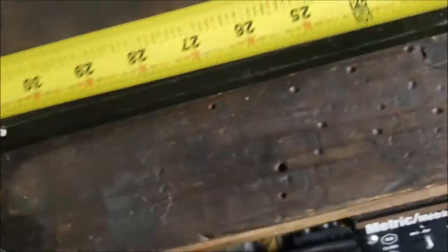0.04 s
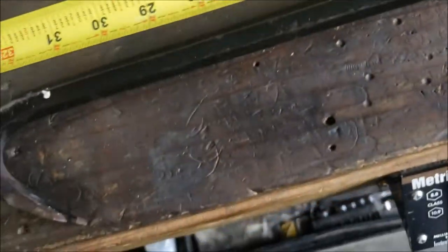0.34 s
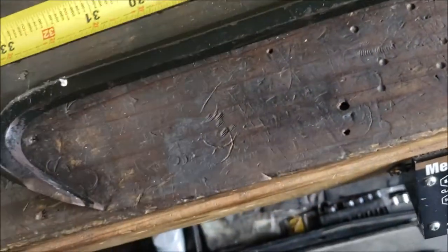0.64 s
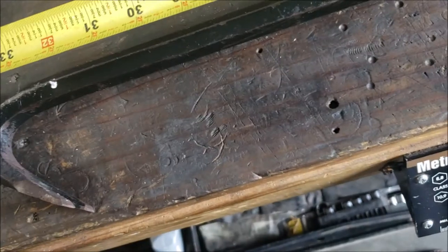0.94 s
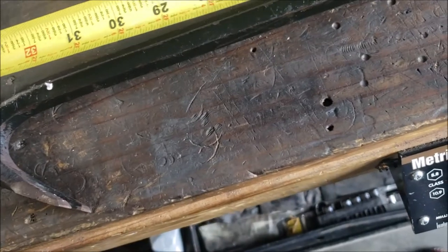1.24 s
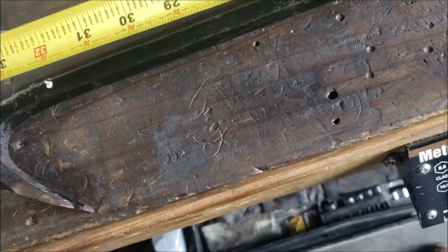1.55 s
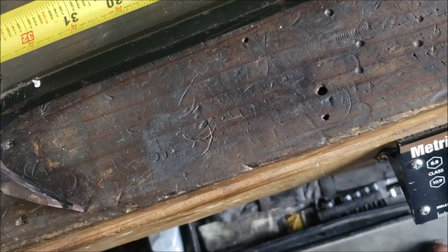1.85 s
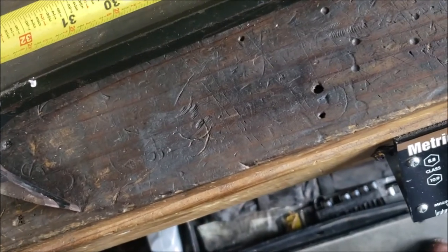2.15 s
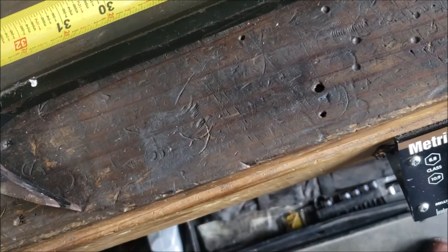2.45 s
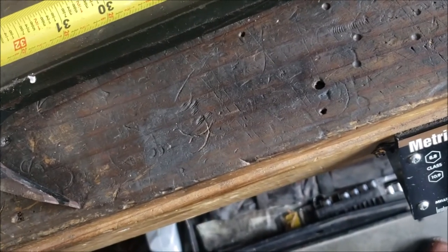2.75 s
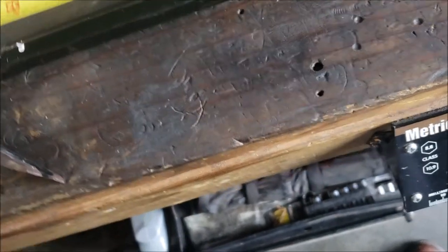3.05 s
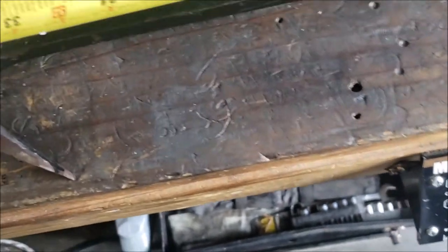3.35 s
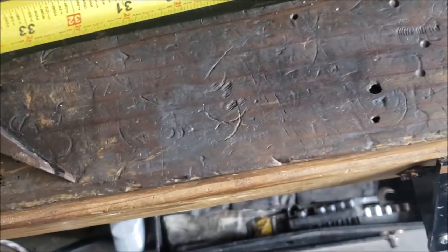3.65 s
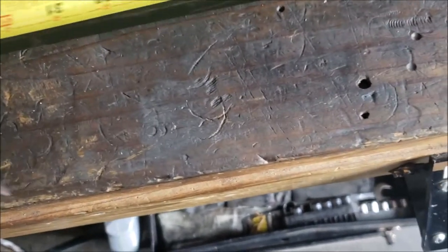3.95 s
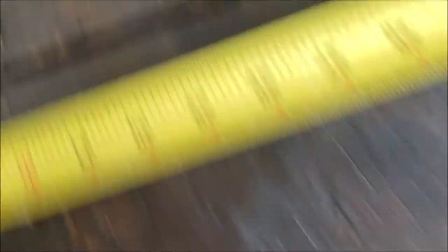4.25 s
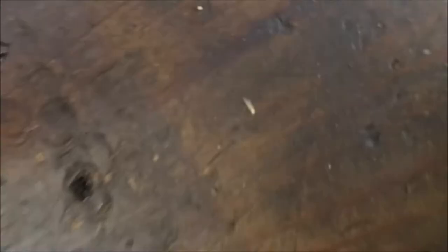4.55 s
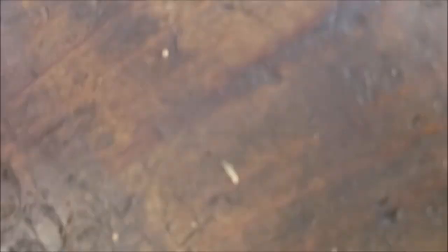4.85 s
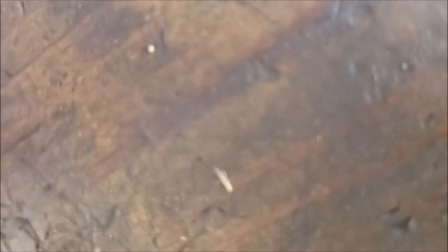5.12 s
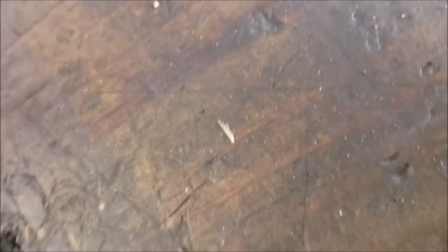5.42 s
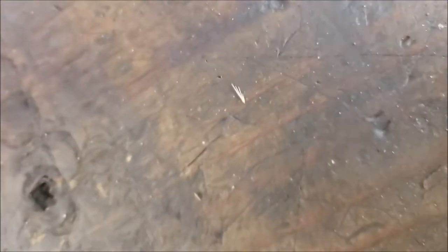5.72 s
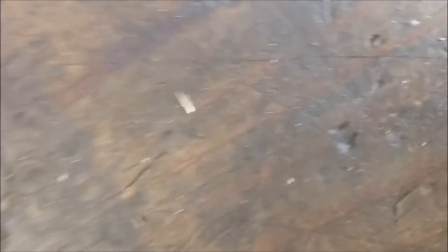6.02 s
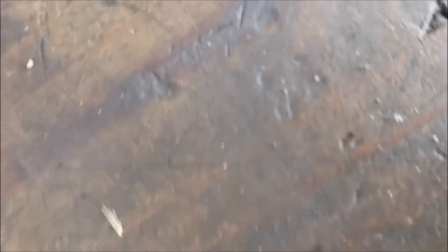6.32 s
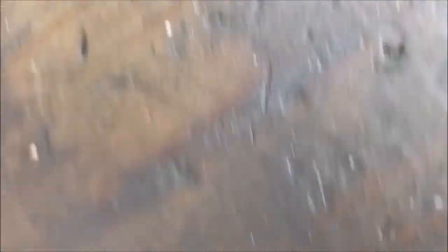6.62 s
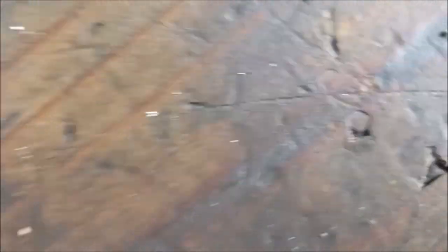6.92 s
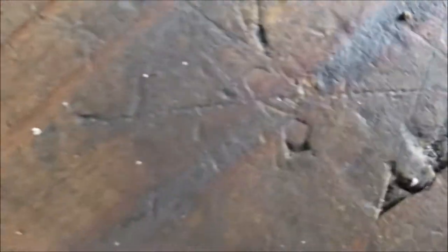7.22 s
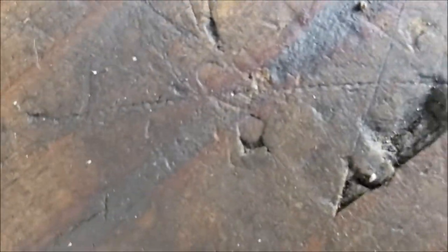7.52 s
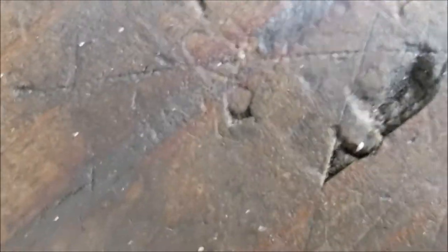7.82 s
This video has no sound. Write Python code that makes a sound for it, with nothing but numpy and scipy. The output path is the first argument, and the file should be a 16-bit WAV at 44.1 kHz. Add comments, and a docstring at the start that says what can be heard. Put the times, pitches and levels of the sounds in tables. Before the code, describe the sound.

Irregular metallic snaps, ticks and short scrapes from a tape measure blade, with one quick retraction and knocks on wood in a small workshop.

```python
"""A steel tape measure is handled on a wooden workbench in a small workshop.
Its hook ticks, and its curved blade buckles with a slap and rings in its bending modes. Friction makes
the blade scrape as it is dragged and as the spring rewinds it; the case knocks and rubs on the wood.
The bench resonates and the walls reflect. A hand on a nearby camera rumbles over the room's low drone."""
import sys
import numpy as np
from scipy import signal
from scipy.fft import rfft, irfft, next_fast_len
from scipy.io import wavfile
from scipy.ndimage import uniform_filter1d, map_coordinates

SR = 44100
rng = np.random.default_rng(int(sys.argv[2]) if len(sys.argv) > 2 else 0)


def log_audio(samples):
    """Write samples as a 16-bit WAV file to the path given in sys.argv[1]."""
    # one column per channel
    frames = np.atleast_2d(samples).T
    # limit to full scale, then quantise
    limited = np.clip(frames, -1, 1)
    pcm = np.round(limited * 32767).astype(np.int16)
    wavfile.write(sys.argv[1], SR, pcm)


N = 351477
TIME = np.arange(N) / SR
HIT = int(.3 * SR)  # samples in one blow
HIT_TIME = np.arange(HIT) / SR


def amp(db):
    """Amplitude ratio of a level in decibels."""
    return 10 ** (np.asarray(db) / 20)


def unit(x):
    """Normalisation to rms 1."""
    return x / np.sqrt(np.mean(x ** 2) + 1e-20)


def along(points, hz):
    """Interpolation on a logarithmic frequency axis."""
    freqs, values = np.transpose(points)
    return np.interp(np.log(hz + 1), np.log(freqs + 1), values)


def curves(rows):
    """Linear interpolation in time: one value per sample for each column after the first."""
    times, *columns = np.transpose(rows)
    return [np.interp(TIME, times, column) for column in columns]


def outside(start, end):
    """Seconds before start or after end, zero in between."""
    return np.maximum(start - TIME, 0) + np.maximum(TIME - end, 0)


def wobble(rate):
    """Smooth random modulation, rate knots a second."""
    return map_coordinates(rng.standard_normal(int(N * rate / SR) + 4), [TIME * rate])


def ripple(hz, width_hz):
    """Modal overlap: random peaks and notches, width_hz wide at 1 kHz and broader above."""
    position = 2 * np.sqrt(1000 * hz) / width_hz
    return map_coordinates(rng.standard_normal(1024), [position], mode="mirror")


def resonance(f, hz, width, db):
    """Frequency response of a damped oscillator."""
    return amp(db) * 1j * f * width / (hz * hz - f * f + 1j * f * width)


def filtered(x, gain):
    """Linear filtering by a real or complex gain, a function of Hz."""
    size = next_fast_len(N + SR // 2)
    return irfft(rfft(x, size) * gain(np.fft.rfftfreq(size, 1 / SR)), size)[..., :N]


def minimum_phase(x, level_db):
    """Causal filtering: nothing sounds before the blow."""
    size = 2 ** 14
    cepstrum = irfft(np.log(amp(level_db(np.fft.rfftfreq(size, 1 / SR)))))
    cepstrum[1:size // 2] *= 2
    cepstrum[size // 2 + 1:] = 0
    return irfft(rfft(x, size) * np.exp(rfft(cepstrum)))[..., :x.shape[-1]]


def stereo_noise(coherence, samples=N):
    """Partial coherence: each channel mixes a common white noise with its own."""
    noise = rng.standard_normal((3, samples))
    return np.sqrt(coherence) * noise[0] + np.sqrt(1 - coherence) * noise[1:]


def wash(colour, coherence):
    """Spectrally shaped stereo noise of rms 1."""
    return unit(filtered(stereo_noise(coherence), lambda hz: amp(along(colour, hz))))


def panned(pan_db):
    """Constant-power panning by a left-minus-right level."""
    half_db = np.atleast_1d(pan_db) / 2
    gains = amp([half_db, -half_db])
    return gains / np.sqrt(np.mean(gains ** 2, axis=0))


# where the tape lies: time_s, pan_db, left_lag_ms, room_send_db
PLACE = [(0, -5.5, 0.4, 6.5), (1.8, -1, 0.28, 1), (2.1, -3.5, -0.3, 5.5), (4.08, -3, -0.34, 4),
         (4.22, -15, 0.34, -5), (5.4, -17, .57, -9), (5.75, -10.5, 0.54, -2), (6.15, -10.5, 0.5, -6.5),
         (6.8, -21.5, 0.31, -2), (8, -12, 0.52, -15)]
PAN_DB, LEFT_LAG_MS, ROOM_SEND_DB = curves(PLACE)
def arrival_delay(x):
    """Path difference: sound reaches left and right at slightly different times."""
    left, right = x
    lag = np.round(LEFT_LAG_MS * SR / 1000).astype(int)
    return np.array([left[np.clip(np.arange(N) - lag, 0, N - 1)], right])


# the hand over the room's drone, and bumps as the grip shifts: time_s, rumble_db, rustle_db
HANDLING = [(0, -66.5, -65), (1.2, -62, -67), (1.7, -61, -72.5), (2.5, -59.5, -67.5), (3.4, -59.5, -65),
            (3.8, -52, -60), (5.4, -58, -65.5), (5.8, -57, -57.5), (6.2, -55.5, -63), (7, -54, -70),
            (7.5, -56, -62.5), (7.97, -66, -75)]
BUMPS = [(1.26, -55.5, -56), (4.039, -56, -45.5), (4.731, -39.5, -48), (6.55, -48, -49), (7.46, -53, -53),
         (7.81, -48.5, -58.5)]
# spectra of rumble, rustle and hiss: frequency_hz, gain_db
RUMBLE = [(20, -35.5), (35, -12), (52, 1.5), (73, 1), (105, -0.5), (150, -4.5), (230, -7.5), (320, -19.5),
          (600, -53)]
RUSTLE = [(100, -17), (200, -10), (370, 2), (520, -8.5), (800, -16), (1500, -20.5), (4000, -33)]
AIR = [(300, -15.5), (700, -13.5), (1500, -23.5), (2500, -7), (5000, -22), (8000, -29.5), (12000, -2),
       (16000, -4)]
def background():
    """Structure-borne noise of the hand on the camera, with room drone and faint hiss; powers add."""
    rumble, rustle = amp(curves(HANDLING))
    for peak_s, rumble_db, rustle_db in BUMPS:
        fade_db = 133.5 * np.abs(TIME - peak_s)
        rumble = np.hypot(rumble, amp(rumble_db - fade_db))
        rustle = np.hypot(rustle, amp(rustle_db - fade_db))
    low = rumble * wash(RUMBLE, coherence=.82) + rustle * wash(RUSTLE, coherence=.71)
    return low * panned(-3) + amp(-72) * wash(AIR, coherence=.13)


# modes of the free blade: pitch_hz, level_db
BLADE_MODES = [(2174, -7), (2818, -6), (3202, -3), (4376, 0), (6292, -10), (6626, -3), (8230, -16),
               (11720, 7), (13110, -1)]
MODE_HZ, MODE_DB = np.transpose(BLADE_MODES)
def blade_modes(pitch_hz, level_db):
    """Modal superposition: one sinusoid per mode, each at a random phase."""
    cycles = np.outer(pitch_hz, HIT_TIME) + rng.random((len(pitch_hz), 1))
    return amp(level_db) @ np.sin(2 * np.pi * cycles)


# how firmly the tape rests on the wood: time_s, coupling_db
PRESS = [(0, -14), (1.8, -14), (3.4, -8), (3.7, 2.5), (4.3, 2.5), (5.2, -4.5), (5.7, -4.5), (6.4, 8.5),
         (8, -0.5)]
PRESS_DB = curves(PRESS)[0]
def impacts(rows, colour, attack_s, crack_db, chatter_db, ripple_db, ring_db, coherence, wood_db):
    """Impact excitation: a crack, then an exponentially decaying burst of contacts and a faint ring."""
    out, t = np.zeros((2, N + HIT)), HIT_TIME
    crack = amp(crack_db) * np.exp(-((t - .0006) / .00049) ** 2)
    rise = 1 - np.exp(-t / attack_s)
    for start_s, level_db, dullness_db, t60_s in rows:
        at = round(start_s * SR)
        body_db = dullness_db + wood_db + .35 * PRESS_DB[at]  # firm contact adds body
        tilt = [(900, body_db), (2400, dullness_db), (4200, dullness_db), (10000, 0)]
        low_cut = [(60, -20), (200, 0)]
        # the blade re-touches at uneven moments, about once a millisecond
        chatter = amp(chatter_db * unit(uniform_filter1d(rng.standard_normal(HIT), size=40)))
        noise = stereo_noise(coherence, HIT)
        bright = np.diff(noise, prepend=0) / 2  # the first hard contact is mostly treble
        burst = bright * crack + noise * chatter * rise * amp(-60 * t / t60_s)
        burst = minimum_phase(burst, lambda hz: along(colour, hz) + along(tilt, hz) + along(low_cut, hz)
                              + ripple_db * ripple(hz, width_hz=170))
        # each bend shifts the modes and shares the blow among them anew
        bent_hz = MODE_HZ * (1 + .015 * rng.standard_normal(len(MODE_HZ)))
        share_db = MODE_DB + along(tilt, MODE_HZ) + 4 * rng.standard_normal((2, len(MODE_HZ)))
        ring = blade_modes(bent_hz, share_db) * rise * amp(-60 * t / (1.6 * t60_s))
        blow = unit(burst) + amp(ring_db) * unit(ring)
        blow *= np.sqrt(.01 * SR / HIT)  # level_db refers to the energy spread over 10 ms
        out[:, at:at + HIT] += amp(level_db) * panned(PAN_DB[at]) * blow
    return out[:, :N]


# ticks of hook and case: start_s, level_db, dullness_db, t60_s
TICKS = [(.02, -45, 0, 0.017), (.1382, -43.5, -2, 0.038), (.4355, -35, -5, 0.11), (.4649, -35, 0.5, .18),
         (2.9413, -49, 10.5, 0.084), (3.038, -53.5, 16, 0.078), (3.1444, -17, -2, 0.016),
         (3.4287, -43.5, 9, 0.052), (3.6362, -21.5, 0.5, 0.024), (3.9715, -27.5, -1.5, 0.032),
         (4.2214, -29, -4.5, 0.0069), (4.8674, -43.5, 13, 0.019), (4.9363, -13, 3, 0.02),
         (5.4476, -44.5, -6, .026), (6.1246, -35, 2, 0.055), (6.3027, -42.5, -5.5, .056),
         (6.32, -41, -1, 0.079), (6.385, -39, -2.5, 0.11), (6.6579, -31, 2, 0.044),
         (6.9118, -43.5, -2.5, 0.081), (7.0021, -48, -2, 0.16), (7.1138, -32, -5.5, 0.066),
         (7.2306, -29.5, 1, 0.038), (7.3368, -28, -6, .036), (7.603, -37.5, -19, 0.049)]
# their spectrum: frequency_hz, gain_db
TICK_COLOUR = [(200, -15.5), (450, -7.5), (800, -9.5), (1300, -11), (1900, -6), (2800, -4.5), (3500, -11),
               (4400, -6), (5500, -11.5), (7000, -12), (9500, -11.5), (11500, -1.5), (13500, -2.5),
               (15700, -6)]
def ticks():
    """Hard contact: hook and case touch so briefly that the pulse is broadband."""
    return impacts(TICKS, TICK_COLOUR, attack_s=.00052, crack_db=10, chatter_db=1,
                   ripple_db=2, ring_db=-31, coherence=.56, wood_db=-1.5)


# modes of the wooden top: pitch_hz, bandwidth_hz, gain_db
BENCH_MODES = [(210, 14, 2), (349, 27, 4), (527.7, 12, 4.5), (653, 29, -2.5), (1128, 9.9, -5)]
def bench(x):
    """Forced vibration: the firmer the tape rests on the top, the harder it drives its modes."""
    return filtered(x * amp(PRESS_DB), lambda f: sum(resonance(f, *mode) for mode in BENCH_MODES))


def blade_resonance(x):
    """Sympathetic vibration: until the rewind, every touch rings one mode of the long blade."""
    return filtered(x * (TIME < REWIND_START_S), lambda f: resonance(f, hz=3200, width=14, db=-1))


# what wood and clutter reflect: frequency_hz, gain_db
WALLS = [(200, 2), (900, 6.5), (2800, 1.5), (6000, -1), (9000, -2.5), (12000, -8.5), (16000, -5)]
# reverberation time of the room: frequency_hz, t60_s
ROOM_DECAY = [(200, 0.12), (1000, 0.35), (3000, 0.29), (7000, 0.29), (15000, 0.27)]
def workshop(direct):
    """Reverberation: early reflections from the bench top, a short diffuse tail from the walls."""
    def reflected(x, response):
        response = response / np.linalg.norm(response, axis=1, keepdims=True)
        return signal.fftconvolve(x, response, axes=1)[:, :N]

    send = filtered(direct * amp(ROOM_SEND_DB), lambda hz: amp(along(WALLS, hz)))
    hz, frame_s, bands = signal.stft(rng.standard_normal((2, SR // 2)), SR, nperseg=256)
    bands *= amp(-60 * frame_s / along(ROOM_DECAY, hz)[:, None])
    tail = signal.istft(bands, SR, nperseg=256)[1]
    t = np.arange(tail.shape[1]) / SR
    tail *= 1 - np.exp(-t / .0035)
    spikes = rng.standard_normal(tail.shape) ** 3  # cubing leaves a few strong reflections
    early = spikes * amp(-60 * t / .096) * (t > .0015)
    spread = .88 * send + .31 * send[::-1]  # the walls even out left and right
    return amp(-6.5) * reflected(send, early) + amp(-9.5) * reflected(spread, tail)


# slaps of the blade, with a few sharp ticks among them: start_s, level_db, dullness_db, t60_s
BUCKLES = [(.2015, -22.5, -2, .11), (.2485, -22.5, -3, 0.045), (.2905, -35, -2, 0.15),
           (.3535, -25, -7.5, 0.017), (.5015, -30.5, 1.5, 0.18), (.536, -39, -2.5, 0.032),
           (.5956, -42, -7, .09), (.9044, -33.5, -12, 0.033), (.9555, -14, -1.5, 0.1),
           (1.012, -28, -1.5, 0.044), (1.115, -26, -3.5, 0.042), (1.133, -26.5, 1.5, 0.031),
           (1.187, -27, 2.5, .3), (1.2437, -18, -3, .12), (1.4392, -44, 1.5, 0.015),
           (1.4746, -50.5, -1, 0.1), (1.4996, -50, 6, 0.054), (1.953, -43, -4, 0.11), (2.179, -27, 1, 0.1),
           (2.3018, -28.5, -7, 0.028), (2.378, -46.5, 5, .02), (2.4105, -43.5, 1, 0.052),
           (2.4905, -41.5, -1, .1), (2.529, -42.5, 0.5, 0.047), (3.3125, -46.5, 11.5, 0.027),
           (4.006, -35, 15, 0.035), (4.0308, -34.5, 12, 0.018), (4.047, -36.5, 4.5, 0.023),
           (4.6759, -33, -3.5, 0.035), (4.7437, -38.5, 7.5, 0.067), (5.7185, -17, -12.5, 0.034),
           (5.77, -13.5, -29, 0.078), (5.9455, -27, 8.5, 0.092), (6.0478, -35.5, 3.5, 0.049),
           (6.4623, -43, 5.5, 0.071), (6.508, -31.5, 4.5, 0.092), (6.5705, -23.5, -6, 0.04),
           (6.6828, -37, 2, 0.12), (6.7182, -37, 2, 0.054), (6.7841, -41.5, 5.5, 0.055),
           (7.135, -42, 14, 0.069), (7.2055, -40.5, 7.5, 0.062), (7.3475, -19.5, -4.5, 0.13),
           (7.372, -18.5, -2, 0.094), (7.407, -31.5, 12, 0.047), (7.4255, -12.5, -4, 0.13),
           (7.441, -24, 14, 0.037), (7.466, -29.5, 7.5, 0.019), (7.7175, -31.5, -2, 0.28),
           (7.7855, -25.5, 8, 0.044)]
# their spectrum: frequency_hz, gain_db
BUCKLE_COLOUR = [(200, -15.5), (450, -10.5), (800, -15), (1300, -11.5), (1900, -8), (2800, -2.5),
                 (3500, -6), (4400, -6), (5500, -8), (7000, -9), (9500, -8), (11500, -0.5), (13500, 2.5),
                 (15700, -6)]
def buckles():
    """Snap-through buckling: the thin curved blade gives way and slaps; a few sharp ticks are played the same
    way."""
    return impacts(BUCKLES, BUCKLE_COLOUR, attack_s=.0017, crack_db=-6.5, chatter_db=3.5,
                   ripple_db=2.5, ring_db=-16, coherence=.55, wood_db=1)


# ringing after hard buckles: start_s, level_db, t60_s
TWANGS = [(0.202, -40, 0.36), (0.956, -44, 0.2), (1.246, -47.5, 0.28), (5.9455, -38, 0.16)]
def twangs():
    """Damped free vibration: the straightened blade sings on in its own modes."""
    out = np.zeros(N)
    rise = 1 - np.exp(-HIT_TIME / .002)
    for start_s, level_db, t60_s in TWANGS:
        ring = unit(blade_modes(MODE_HZ, MODE_DB + 2 * rng.standard_normal(len(MODE_HZ))))
        at = round(start_s * SR)
        out[at:at + HIT] += ring * rise * amp(level_db - 60 * HIT_TIME / t60_s)
    return out * panned(PAN_DB)


def sliding(chatter_db, hiss_db, colour_db, grain_db, judder_db, ripple_db):
    """Sliding friction: steel catches densely and unevenly on an edge, juddering as it flutters."""
    catches = stereo_noise(coherence=.3) * amp(grain_db * wobble(3000) + judder_db * wobble(140))
    steel = filtered(catches, lambda hz: amp(colour_db(hz) + ripple_db * ripple(hz, width_hz=62)))
    chatter = filtered(steel, lambda hz: 1 / (1 + (hz / 7000) ** 8))
    hiss = steel - chatter
    return (amp(chatter_db) * unit(chatter) + amp(hiss_db) * unit(hiss)) * panned(PAN_DB)


# short pulls on the blade: fastest_s, run_up_s, level_db
DRAGS = [(3.959, 0.084, -51.5), (4.195, 0.0081, -52), (4.61, 0.029, -53), (4.71, 0.04, -49.5),
         (5.69, 0.038, -25), (5.722, 0.026, -26), (5.778, 0.042, -28), (5.841, 0.023, -38.5),
         (5.875, .02, -43.5), (6.09, 0.078, -43.5), (6.169, 0.012, -40), (6.209, .01, -57),
         (6.561, 0.06, -41), (7.594, 0.02, -51), (7.781, 0.014, -30)]
# their spectrum: frequency_hz, gain_db
DRAG_COLOUR = [(100, -34), (250, -14.5), (900, -13.5), (1400, -10), (2100, -9), (3200, -2.5), (4400, 1.5),
               (5500, -10.5), (6500, -3.5), (8000, -12), (9500, -10.5), (11700, 1.5), (13500, -3.5),
               (16000, -2)]
def drags():
    """Friction noise grows with speed: each stroke gets louder and brighter until it is let go."""
    grab_db_per_s, release_db_per_s, usual_db = 903, 549, -39.5
    chatter_db = np.full(N, -140.0)
    for fastest_s, run_up_s, level_db in DRAGS:
        swell_db = -8 * np.clip((fastest_s - TIME) / run_up_s, 0, 1)
        grab_db = -grab_db_per_s * np.maximum(fastest_s - run_up_s - TIME, 0)
        release_db = -release_db_per_s * np.maximum(TIME - fastest_s, 0)
        chatter_db = np.maximum(chatter_db, level_db + swell_db + grab_db + release_db)
    hiss_db = usual_db + 6 + 1.14 * (chatter_db - usual_db)  # hiss grows faster than chatter
    return sliding(chatter_db, hiss_db, lambda hz: along(DRAG_COLOUR, hz),
                   grain_db=3, judder_db=3, ripple_db=1)


# knocks of the case: start_s, level_db, dullness_db, t60_s
KNOCKS = [(4.145, -46, 4, 0.015), (4.9622, -24.5, 3.5, 0.027), (5.0198, -21, 6, 0.012),
          (5.085, -31, -3.5, 0.062), (5.3893, -23, -2, 0.02), (5.506, -30, 9, 0.028),
          (5.6093, -34.5, 13.5, 0.038)]
# their spectrum: frequency_hz, gain_db
KNOCK_COLOUR = [(200, -6.5), (450, -11), (800, -3), (1300, -1), (1900, 0), (2800, 2), (3500, -3),
                (4400, -2.5), (5500, -11), (7000, -12.5), (9500, -21.5), (11500, -11), (13500, -17.5),
                (15700, -11.5)]
def knocks():
    """Damped impact: the case strikes and rocks on the wood, and each blow dies quickly."""
    return impacts(KNOCKS, KNOCK_COLOUR, attack_s=.00019, crack_db=8.5, chatter_db=4,
                   ripple_db=2, ring_db=-36, coherence=1, wood_db=1)


REWIND_START_S, REWIND_FAST_S, REWIND_HOME_S = 4.945, 5.015, 5.33
# spectrum of the blade running home: frequency_hz, gain_db
REWIND_COLOUR = [(180, -65), (300, -37), (337, -21.5), (1170, -23), (1720, -9), (2100, -13.5),
                 (2880, -12.5), (4090, -5.5), (4590, -12), (6410, -10), (7570, -14), (8220, -8),
                 (9390, -14.5), (12300, -4), (16000, -10)]
def rewind():
    """Friction and cavity resonance: the spring draws the blade in; the spool rings the hollow case."""
    def colour_db(hz, cavity_hz=1600, width_hz=490):
        return along(REWIND_COLOUR, hz) + 5.9 / (1 + (2 * (hz - cavity_hz) / width_hz) ** 2)

    spin_up_left = np.clip((REWIND_FAST_S - TIME) / (REWIND_FAST_S - REWIND_START_S), 0, 1)
    slowing_s = np.maximum(TIME - REWIND_FAST_S, 0)
    gate_db = -899.5 * outside(REWIND_START_S, REWIND_HOME_S)  # abrupt start and stop
    chatter_db = -36.5 - 8 * spin_up_left - 40 * slowing_s + gate_db
    hiss_db = -27 - 18 * spin_up_left - 43 * slowing_s + gate_db
    return sliding(chatter_db, hiss_db, colour_db, grain_db=2, judder_db=1, ripple_db=3)


# spectrum of the case rubbing on wood: frequency_hz, gain_db
PUSH_COLOUR = [(200, -9.5), (600, -7), (1500, -17), (3500, -20), (8000, -14), (12000, -13), (16000, -13)]
# modes of the hollow case: pitch_hz, bandwidth_hz, gain_db
CASE_MODES = [(1105, 50, 0.5), (2213, 160, -5), (2509, 120, -8), (4330, 200, -7)]
def push():
    """Frictional excitation: pushed over the wood, the case sounds its hollow modes."""
    def response(hz):
        return amp(along(PUSH_COLOUR, hz)) + sum(resonance(hz, *mode) for mode in CASE_MODES)

    friction = stereo_noise(coherence=.53) * amp(3.8 * wobble(60))
    level_db = -55.5 - 299 * outside(start=7.47, end=7.76)
    return amp(level_db) * unit(filtered(friction, response)) * panned(PAN_DB)


def scene():
    """Superposition of the tape's direct sound, the resonances it drives, the room and the background."""
    direct = arrival_delay(buckles() + ticks() + knocks() + drags() + rewind() + push()) + twangs()
    return direct + bench(direct) + blade_resonance(direct) + workshop(direct) + background()


def record(dry):
    """Soft saturation rounds the tallest peaks; a steep low-pass limits the band."""
    rounded = dry / (1 + np.abs(dry / .82) ** 6) ** (1 / 6)
    top_hz = 16000
    band_edge = [(top_hz - 200, 0), (top_hz + 100, -13), (top_hz + 600, -22),
                 (top_hz + 1200, -65), (top_hz + 2000, -100)]
    return filtered(rounded, lambda hz: amp(along(band_edge, hz)))


dry = scene()
out = record(dry)
log_audio(out)
```